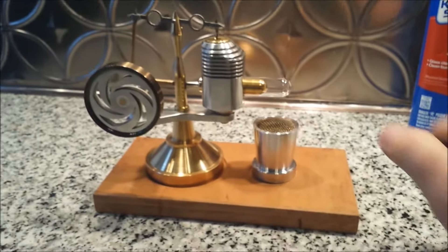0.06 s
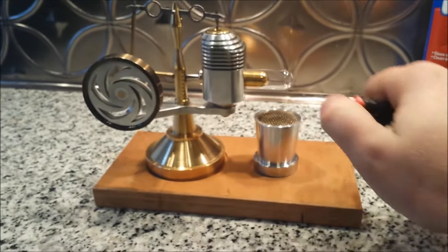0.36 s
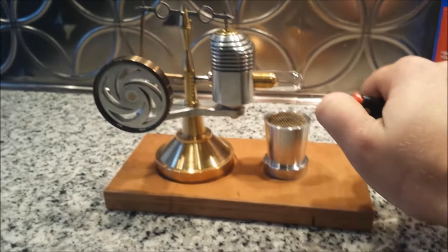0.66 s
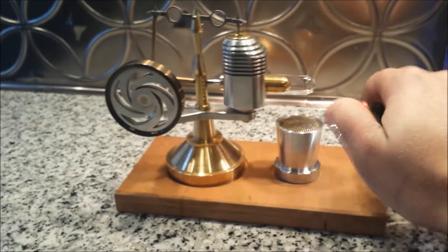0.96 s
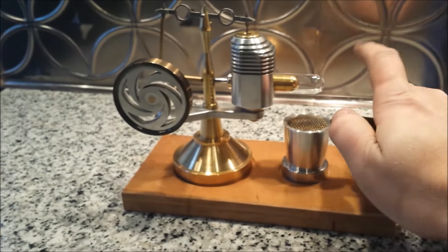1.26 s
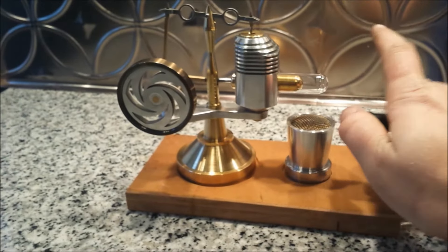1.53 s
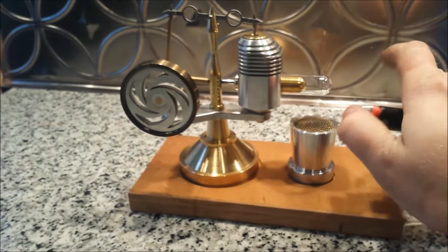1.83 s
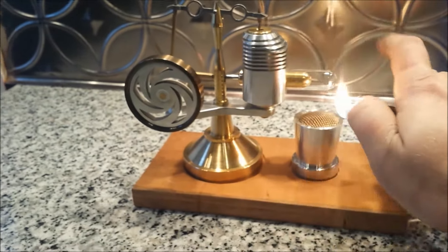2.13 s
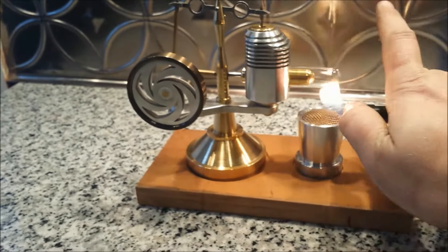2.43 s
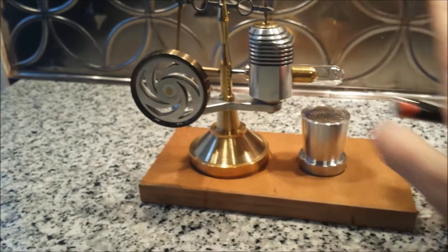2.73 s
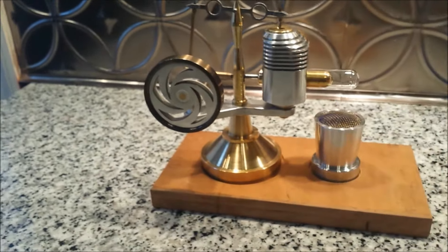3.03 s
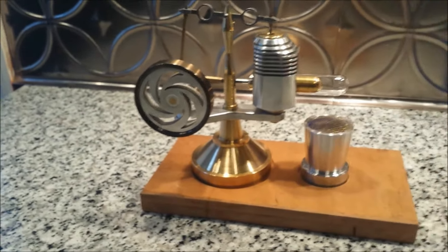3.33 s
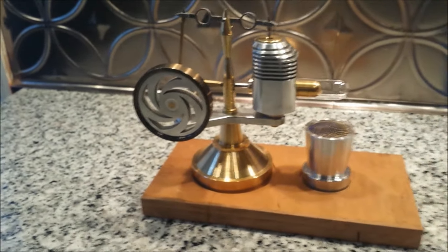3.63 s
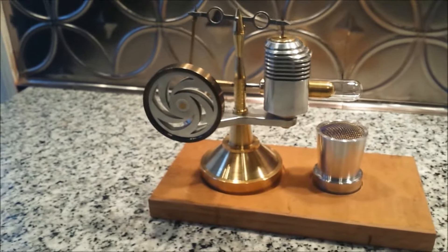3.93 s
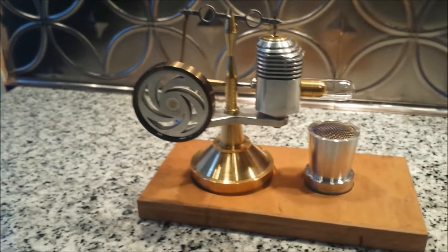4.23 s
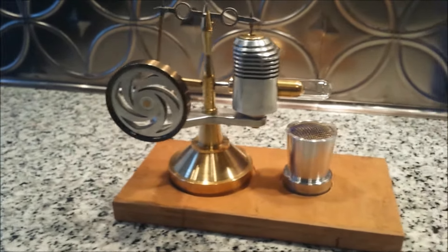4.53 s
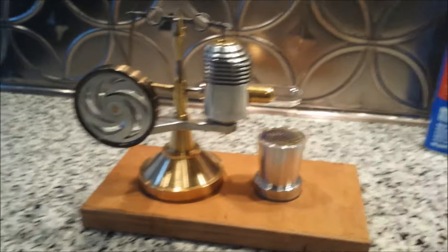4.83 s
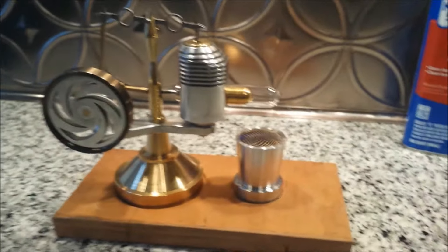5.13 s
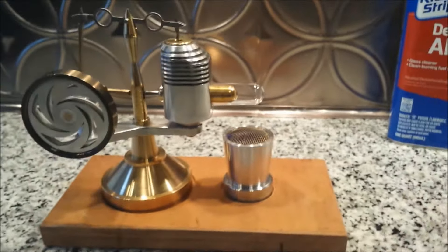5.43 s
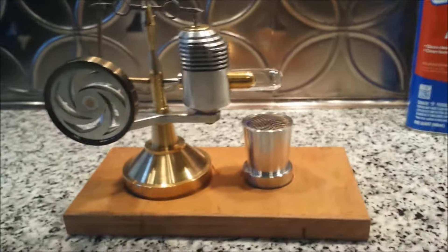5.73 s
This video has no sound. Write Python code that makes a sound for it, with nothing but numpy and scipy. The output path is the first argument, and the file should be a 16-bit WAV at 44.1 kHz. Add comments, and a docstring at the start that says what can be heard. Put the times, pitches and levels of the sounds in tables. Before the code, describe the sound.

A lighter snaps twice, a small flame catches with a soft puff, then come light knocks and faint microphone handling.

```python
"""Over a low hum, a piezo lighter snaps beside a small spirit burner, and the hard kitchen rings.
The trigger ticks back, the hammer snaps on the crystal again, and the wick catches with a soft puff.
After more trigger ticks, the plastic lighter is put down on the stone counter with two knocks.
Last, fingers rub and tap on the camera's hollow shell as it is moved, close and fairly dry."""
import sys
import numpy as np
from scipy import signal
from scipy.fft import rfft, irfft
from scipy.io import wavfile
from scipy.ndimage import uniform_filter1d

SR = 44100
rng = np.random.default_rng(int(sys.argv[2]) if len(sys.argv) > 2 else 0)


def digitize_waveform(pressure):
    """Quantize a signal to 16-bit integers and store it at the path in sys.argv[1].

    Rows of a 2-D input are taken as channels; values are limited to [-1, 1].
    """
    field = np.atleast_2d(pressure).T
    bounded = np.clip(field, -1, 1)
    quanta = np.round(bounded * 32767).astype(np.int16)
    wavfile.write(sys.argv[1], SR, quanta)


N = 258867
HZ = np.fft.rfftfreq(4096, 1 / SR)  # frequency axis of the EQ curves
T = np.arange(SR // 8) / SR  # time axis of one short hit

# room tone: f/Hz, level/dB
AIR_EQ = [(15, -34), (25, -23.5), (60, -14), (100, -12), (150, -10), (220, -8), (320, -7), (410, -16),
          (600, -17.5), (800, -21), (1400, -24), (2700, -29), (7000, -28.5), (14000, -30.5)]
# how centred the room tone is: f/Hz, left-right correlation
AIR_CORRELATION = [(50, 0.48), (200, 0.97), (500, .55), (1200, 0.12), (4000, .05), (15000, .05)]
# partials of an appliance's hum: f/Hz, level/dB
HUM_PARTIALS = [(119, -78), (145.3, -81), (183, -73), (210, -73.5), (216, -75), (597.5, -84)]
# decay of the kitchen reverb: f/Hz, t60/s
REVERB_T60 = [(100, 0.88), (500, 0.99), (1500, 0.97), (3000, .53), (5500, 0.56), (8000, .48), (11000, .41),
              (15000, 0.29)]
# tone of that reverb: f/Hz, level/dB
REVERB_EQ = [(100, -2.5), (300, -1.5), (600, -2), (1200, -1), (2000, 0.5), (4500, -1.5), (6000, 0),
             (9000, -1.5), (14000, -2.5)]
# tonal imbalance of the two microphone ports: f/Hz, left minus right/dB
PORT_BALANCE = [(100, 0.5), (400, -1.5), (700, 2.5), (1300, 0.5), (2400, -4.5), (3400, -0.5), (4400, 4.5),
                (5500, 6), (7000, -6), (8500, -5.5), (10500, -10), (14000, -7)]

# tone of rubbing skin: f/Hz, level/dB
SKIN_EQ = [(60, 1), (300, 0), (900, -0.5), (2000, -4), (4000, -2), (7000, -6), (10000, -8.5),
           (12000, -13.5), (15000, -29.5)]
# tone of the camera shell: f/Hz, level/dB
SHELL_EQ = [(60, -6.5), (200, 0.5), (500, -9.5), (1200, -10), (2500, -4), (4000, -9.5), (6300, 0.5),
            (9000, -6.5), (12000, -19), (15000, -13.5)]
# fader curve of the shifting grip: t/s, level/dB
GRIP_CURVE = [(4.45, -73.5), (4.66, -62), (4.86, -60), (4.97, -61), (5.17, -62), (5.26, -60), (5.43, -67),
              (5.55, -59.5), (5.7, -69), (5.87, -60.5)]
# one long fingertip slide, its hiss sinking as it slows: t/s, level/dB, centre f/Hz, pan/dB
SLIDE_CURVE = [(4.48, -67, 7000, -3), (4.51, -57, 7100, -4), (4.63, -52.5, 7100, -2), (4.69, -60, 5600, 10),
               (4.76, -61.5, 5400, 13), (4.79, -65, 5700, 6), (4.83, -54, 5800, 9), (4.89, -74, 5800, 2)]
# the shell clicks under the grip: t/s, level/dB, ring trim/dB, pan/dB
SHELL_CLICKS = [(4.8187, -32, -12, 1), (4.87, -32, -13, -6.5), (4.9087, -31.5, -13, -9),
                (4.925, -30.5, -3, 0), (5.7161, -35, 6.5, -6)]
# a finger lands and scuffs: t/s, tap/dB, scuff length/s, scuff/dB, hollow boom/dB, pan/dB
FINGER_TOUCHES = [(4.4857, -47, 0.013, -64, -63.5, 7), (4.637, -37, 0.048, -52, -57.5, 11.5),
                  (5.0027, -38, 0.09, -44.5, -40.5, 4.5), (5.137, -60, 0.0093, -48.5, -77, 11.5),
                  (5.3422, -65, 0.017, -50, -77, 11.5), (5.582, -48.5, 0.04, -53, -63, 14)]
# soft bumps of the hand: t/s, level/dB
HAND_BUMPS = [(2.183, -51.5), (4.635, -50), (4.9, -50), (5.243, -52.5), (5.826, -51), (5.842, -46)]

# tone of plastic on stone: f/Hz, level/dB
COUNTER_EQ = [(60, -15), (200, -13), (500, -4), (900, -5.5), (1600, 0.5), (2600, -0.5), (5500, -1.5),
              (7500, -4.5), (11000, -9), (15000, -8.5)]
# the lighter meets the counter: t/s, level/dB, ring f/Hz, settle delay/s, settle level/dB
COUNTER_KNOCKS = [(3.2513, -46, 1460, .0155, -51), (3.5447, -29.5, 5150, .0069, -43)]
# tone of the catching flame: f/Hz, level/dB
FLAME_EQ = [(30, -26), (70, -3), (120, 1), (220, -6.5), (380, -11), (700, -16), (1300, -23.5), (2500, -36),
            (8000, -40)]
# chatter of the lighter's plastic case: f/Hz, level/dB
CASE_EQ = [(60, -22), (140, -12.5), (330, -13), (560, -20), (1300, -19), (2300, -13), (3200, -5),
           (5000, -1), (6400, 0), (7500, -0.5), (9000, -3), (11000, -8.5), (14000, -4)]
# modes of the case and spring: f/Hz, level/dB, t60/s
LIGHTER_MODES = [(135, -30, 0.086), (830, -29, .06), (1175, -31, 0.044), (1601, -30.5, .04),
                 (3240, -19.5, 0.029), (5520, -14.5, .025), (7530, -14, 0.023), (5600, -31.5, .45),
                 (5650, -30, .5), (7250, -36, .45), (7560, -35.5, .45)]
# loose ticks of the trigger: t/s, level/dB
LOOSE_TICKS = [(0.976, -35.5), (1.3016, -53), (2.4046, -54), (2.729, -58)]
# trigger pulls: snap t/s, level/dB, ring f/Hz, tilt/(dB per octave), modes/dB, thump/dB,
# slide length/s, slide level/dB, squeak f/Hz, release t/s
TRIGGER_PULLS = [(0.6994, -10.7, 4300, -.2, -8, -32, .046, -40, 7902, 1.2705),
                 (1.6707, -13.7, 5550, -.6, .5, -42, .038, -36, 6300, 2.294)]


def amp(db):
    """Decibels to gain."""
    return 10 ** (np.asarray(db) / 20)


def unit_rms(x):
    """Normalises to an rms of 1."""
    return x / np.sqrt(np.mean(x ** 2) + 1e-20)


def curve(points, hz=HZ):
    """Joins breakpoints on a log-frequency axis."""
    f, value = np.transpose(points)
    return np.interp(np.log(hz + 1), np.log(f + 1), value)


def tilted(points, tilt_db):
    """An EQ curve tilted by tilt_db an octave about 1 kHz; the tilt levels off in the bass."""
    return curve(points) + tilt_db * np.log2(np.maximum(HZ, 300) / 1000)


def bell(hz, octaves):
    """A bell-shaped resonance of height 1 over HZ."""
    return np.exp(-.5 * (np.log2((HZ + 1) / hz) / octaves) ** 2)


def eq(x, db):
    """Minimum-phase EQ with the given gain over HZ."""
    log_gain = np.log(amp(np.r_[db, db[-2:0:-1]]))
    response = np.exp(np.conj(signal.hilbert(log_gain)))
    taps = np.fft.ifft(response).real[:len(HZ)]
    return signal.oaconvolve(x, taps[None], axes=1)[:, :x.shape[1]]


def add(mix, s, sound):
    """Mixes a sound in at s seconds."""
    part = mix[:, round(s * SR):][:, :sound.shape[1]]
    part += sound[:, :part.shape[1]]


def pan(db):
    """Stereo gains for a steady or moving level difference, left minus right."""
    return amp(np.vstack([db, -db]) / 2)


def automation(points):
    """Breakpoints to lanes: first a gain, silent outside the points, then any other columns."""
    t = np.arange(N) / SR
    s, db, *others = np.transpose(points)
    gain = amp(np.interp(t, s, db)) * (t > s[0]) * (t < s[-1])
    return [gain] + [np.interp(t, s, column) for column in others]


def stereo_noise(size, correlation):
    """White noise, partly shared by left and right."""
    a, b = rng.standard_normal((2, size))
    return np.array([a, correlation * a + np.sqrt(1 - correlation ** 2) * b])


def swell(attack_s):
    """An envelope that peaks at attack_s and dies away."""
    return T / attack_s * np.exp(1 - T / attack_s)


def thud(hz, attack_s):
    """A soft low blow: one sine under a swell."""
    return swell(attack_s) * np.sin(2 * np.pi * hz * T)


def strike(body_eq, ring_hz, ring_trim_db, attack_s, ring_t60, scatter_db, scatter_t60):
    """Chattering contact through a body, one ringing mode, and scatter from things nearby."""
    contact = swell(attack_s)
    scatter = amp(scatter_db - 60 * T / scatter_t60)
    burst = eq(stereo_noise(len(T), correlation=.086) * (contact + scatter), body_eq)
    decay = signal.fftconvolve(contact ** 2, amp(-60 * T / ring_t60))[:len(T)]
    ring = decay * np.sin(2 * np.pi * ring_hz * T + np.array([[0], [-1.2]]))  # sides out of phase
    return (unit_rms(burst) + amp(ring_trim_db - 4) * unit_rms(ring)) * np.sqrt(np.mean(contact ** 2))


def rub(body_eq, length_s, grain_db):
    """Friction: one stroke of noise in small uneven grains."""
    size = int(length_s * SR)
    grains = unit_rms(uniform_filter1d(rng.standard_normal(SR // 4)[:size], size=90))
    noise = stereo_noise(SR // 4, correlation=.5)[:, :size]
    return unit_rms(eq(noise * amp(grain_db * grains), body_eq))


def room_tone(level_db=-62.62):
    """The bed: low room air under a faint, wide hiss."""
    hz = np.fft.rfftfreq(N, 1 / SR)
    a, b = rfft(rng.standard_normal((2, N)))
    shared = curve(AIR_CORRELATION, hz)
    spectrum = np.array([a, shared * a + np.sqrt(1 - shared ** 2) * b])
    return amp(level_db) * unit_rms(irfft(spectrum * amp(curve(AIR_EQ, hz)), N))


def appliance_hum():
    """A low hum whose partials each waver in level and phase."""
    t = np.arange(N) / SR
    knots = np.linspace(0, t[-1], num=40)
    hum = np.zeros(N)
    for hz, db in HUM_PARTIALS:
        drift = rng.standard_normal((len(knots), 2)) @ [1, 1j]
        waver = np.interp(t, knots, 1 + 1.1 * drift)
        hum += amp(db) * unit_rms((waver * np.exp(2j * np.pi * hz * t)).real)
    return hum * pan(1.43)


def kitchen_reverb(send, build_s=.0031):
    """Diffuse reflections: each band dies at its own speed, and the walls blend both sides."""
    hz, age, noise = signal.stft(rng.standard_normal((2, 2, SR)), SR, nperseg=128)
    onset = 1 - np.exp(-(age / build_s) ** 2)
    decay = amp(-60 * age / curve(REVERB_T60, hz)[:, None]) * onset
    band_energy = 2 * SR * np.mean(decay ** 2, axis=1, keepdims=True)
    decay *= amp(curve(REVERB_EQ, hz))[:, None] / np.sqrt(band_energy)
    tails = signal.istft(noise * decay, SR, nperseg=128)[1]
    return signal.fftconvolve(send[None], tails, axes=2).sum(axis=1)[:, :N]


def palm():
    """The palm shifts on the camera: skin rustles and the body rumbles."""
    gain, = automation(GRIP_CURVE)
    rustle_eq = tilted(SKIN_EQ, -.3) + 6 * bell(hz=2320, octaves=.22)
    rumble_eq = tilted(SKIN_EQ, -6) + 7.6 * bell(hz=194, octaves=.6)
    rustle = unit_rms(eq(stereo_noise(N, correlation=.21), rustle_eq))
    rumble = unit_rms(eq(stereo_noise(N, correlation=.91), rumble_eq))
    return gain * pan(2.1) * (rustle + amp(1) * rumble)


def fingertip(width_hz=2600):
    """A fingertip slides over the shell: a band of hiss that sweeps down as it slows."""
    gain, centre_hz, pan_db = automation(SLIDE_CURVE)
    lowpass = signal.butter(2, width_hz / 2, fs=SR, output="sos")
    band = signal.sosfilt(lowpass, stereo_noise(N, correlation=.37))
    carrier = np.cos(2 * np.pi * np.cumsum(centre_hz) / SR)
    return gain * pan(pan_db) * unit_rms(band * carrier)


def finger_touch(tap_db, scuff_s, scuff_db, boom_db, boom_rise_s=.0014, boom_t60=.28):
    """A dull tap, a brief boom of the air inside the shell and a scuff of skin."""
    out = amp(tap_db) * strike(tilted(SHELL_EQ, -3.5), ring_hz=942, ring_trim_db=-1, attack_s=.00071,
                               ring_t60=.0023, scatter_db=-23, scatter_t60=.04)
    boom_eq = tilted(SKIN_EQ, -1) + 20 * bell(hz=490, octaves=.77)
    boom = unit_rms(eq(stereo_noise(len(T), correlation=.27), boom_eq))
    out += amp(boom_db - 60 * T / boom_t60) * (1 - np.exp(-T / boom_rise_s)) * boom
    scuff = rub(tilted(SKIN_EQ, -.5) + 9 * bell(hz=6020, octaves=.38), scuff_s, grain_db=1.5)
    add(out, 0, amp(scuff_db) * scuff * signal.windows.tukey(scuff.shape[1], .8))
    return out


def handling(squeak_at_s=5.125):
    """Fingers tap, scuff, squeak and bump on the camera, and its shell clicks under the grip."""
    out = fingertip() + palm()
    for s, db, ring_trim_db, pan_db in SHELL_CLICKS:
        click = strike(tilted(SHELL_EQ, .7), ring_hz=6270, ring_trim_db=ring_trim_db, attack_s=.00035,
                       ring_t60=.0033, scatter_db=-21, scatter_t60=.05)
        add(out, s, amp(db) * pan(pan_db) * click)
    for s, tap_db, scuff_s, scuff_db, boom_db, pan_db in FINGER_TOUCHES:
        add(out, s, pan(pan_db) * finger_touch(tap_db, scuff_s, scuff_db, boom_db))
    squeak = rub(curve(SKIN_EQ) + 22 * bell(hz=2330, octaves=.14), length_s=.14, grain_db=2)
    add(out, squeak_at_s, amp(-65) * squeak * signal.windows.tukey(squeak.shape[1], .5))
    for s, db in HAND_BUMPS:
        add(out, s, amp(db) * pan(1.4) * thud(hz=148, attack_s=.0044))
    return out


def knock(db, ring_hz, ring_trim_db, attack_s, neutral_db=-34, tilt_per_db=.36):
    """Plastic on stone: the harder, the brighter."""
    body_eq = tilted(COUNTER_EQ, tilt_per_db * (db - neutral_db))
    return amp(db) * strike(body_eq, ring_hz, ring_trim_db, attack_s,
                            ring_t60=.019, scatter_db=-7.5, scatter_t60=.21)


def put_down(lead_in_s=.015):
    """The lighter touches the counter, then drops flat; a faint, soft noise leads into each knock."""
    out = np.zeros((2, N))
    for s, db, ring_hz, settle_s, settle_db in COUNTER_KNOCKS:
        add(out, s - lead_in_s, knock(db - 27, ring_hz, ring_trim_db=-10, attack_s=.004))
        low_boom = amp(db - 27.5) * thud(hz=205, attack_s=.041)  # swells softly after the knock
        add(out, s, knock(db, ring_hz, ring_trim_db=-1.5, attack_s=.0014) + low_boom)
        add(out, s + settle_s, knock(settle_db, ring_hz=3620, ring_trim_db=-5, attack_s=.0048))
    return out * pan(2)


def flame(s=1.992, push_hz=118, push_db=-32.5, flutter_db=-40.5):
    """The vapour catches: a low push of air and a short flutter."""
    out = np.zeros((2, N))
    push = swell(.0069) ** 4 * np.sin(2 * np.pi * push_hz * T)
    flutter = unit_rms(eq(stereo_noise(len(T), correlation=.77), curve(FLAME_EQ)))
    add(out, s + .004, amp(push_db) * push * pan(1.2))
    add(out, s, amp(flutter_db) * flutter * swell(.014) ** 1.2)
    return out


def case_hit(ring_hz, ring_trim_db, attack_s, tilt_db, modes_db, bell_db=3):
    """A blow inside the lighter: the case chatters and its modes ring on."""
    t = np.arange(SR // 2) / SR
    modes = sum(amp(db - 60 * t / t60) * np.sin(2 * np.pi * hz * t) for hz, db, t60 in LIGHTER_MODES)
    out = np.tile(amp(modes_db) * modes * (1 - np.exp(-t / attack_s)), (2, 1))
    body_eq = tilted(CASE_EQ, tilt_db) + bell_db * bell(ring_hz, octaves=.16)
    add(out, 0, strike(body_eq, ring_hz, ring_trim_db, attack_s,
                       ring_t60=.007, scatter_db=-17, scatter_t60=.17))
    return out


def trigger_ticks(unstick_lead_s=.0155, unstick_db=-52.5, stop_db=-43.5):
    """The trigger ticks loosely; on each release it unsticks, then springs against its stop."""
    out, ticks = np.zeros((2, N)), list(LOOSE_TICKS)
    for *_, release_s in TRIGGER_PULLS:
        ticks += [(release_s - unstick_lead_s, unstick_db), (release_s, stop_db)]
    for s, db in ticks:
        tick = case_hit(ring_hz=5330, ring_trim_db=-5, attack_s=.0011, tilt_db=-4, modes_db=-2)
        add(out, s, amp(db) * tick)
    return out


def lighter_snaps(slide_rise_db=15, catch_lead_s=.0105, catch_db=-38):
    """The trigger slides, the catch slips, and the hammer snaps on the crystal, jolting the case."""
    out = np.zeros((2, N))
    for s, db, ring_hz, tilt_db, modes_db, thump_db, slide_s, slide_db, squeak_hz, _ in TRIGGER_PULLS:
        slide = rub(curve(CASE_EQ) + 7 * bell(squeak_hz, octaves=.149), slide_s, grain_db=3)
        fade_db = np.linspace(-slide_rise_db, 0, slide.shape[1])  # louder as the spring tightens
        add(out, s - slide_s, amp(slide_db + fade_db) * slide)
        catch = case_hit(squeak_hz, ring_trim_db=-3, attack_s=.0035, tilt_db=.7, modes_db=-2.5)
        add(out, s - catch_lead_s, amp(catch_db) * catch)
        snap = case_hit(ring_hz, ring_trim_db=-11, attack_s=.00135,
                        tilt_db=tilt_db, modes_db=modes_db, bell_db=5)
        add(out, s, amp(db) * snap)
        add(out, s, amp(thump_db) * thud(hz=260, attack_s=.0012)[None])
    return out


def snap_dip(start_s=.7075, end_s=.7225, depth_db=-8):
    """The level dips briefly after the first snap."""
    t = np.arange(N) / SR
    gate = ((t > start_s) & (t < end_s)).astype(float)
    return amp(depth_db * uniform_filter1d(gate, size=80))


def scene():
    """The lighter fills the room and reaches two ports of different colour; handling is drier."""
    lighter_pan = pan(1.1)
    snaps, ticks = lighter_snaps() * lighter_pan, trigger_ticks() * lighter_pan
    knocks, hands = put_down(), handling()
    send = amp(-1) * snaps + amp(-6.5) * ticks + amp(-8.5) * knocks + amp(-13) * hands
    far = snaps + ticks + knocks + kitchen_reverb(send)
    port_eq = curve(PORT_BALANCE) / 2
    far = np.vstack([eq(far[:1], port_eq), eq(far[1:], -port_eq)])
    low_cut = signal.butter(2, 40, "high", fs=SR, output="sos")  # small ports pass little deep bass
    foley = signal.sosfilt(low_cut, far * snap_dip() + flame() + hands)
    return foley + room_tone() + appliance_hum()


def record(dry, cutoff_hz=14750):
    """A steep high cut on the whole mix: the camera's band limit."""
    high_cut = signal.firwin(401, cutoff_hz, window=("kaiser", 8), fs=SR)
    return signal.oaconvolve(dry, high_cut[None], "same")


dry = scene()
out = record(dry)
digitize_waveform(out)
```